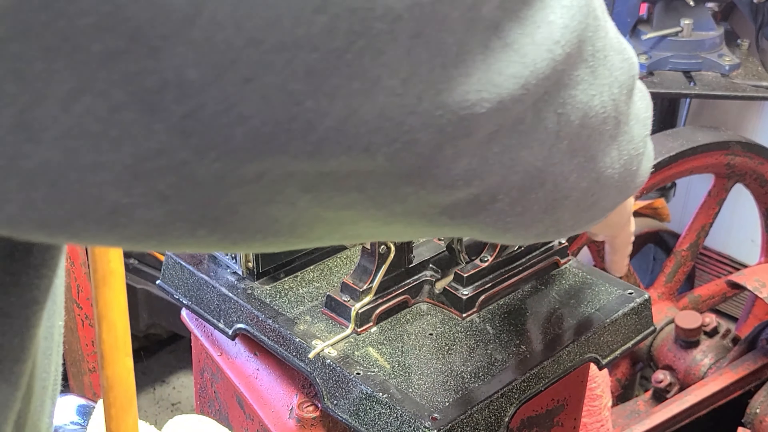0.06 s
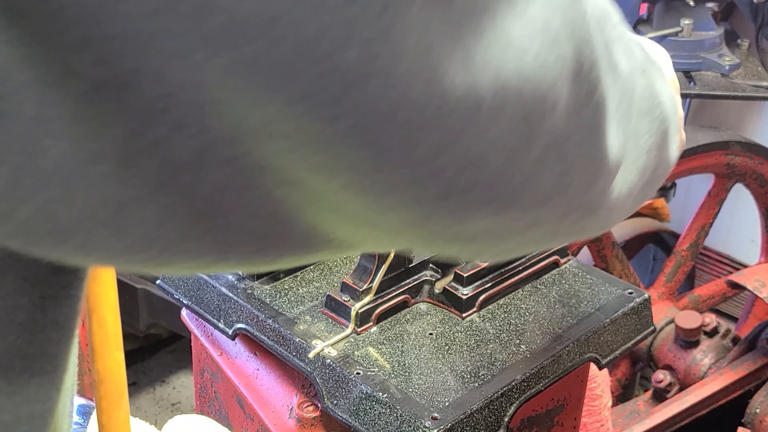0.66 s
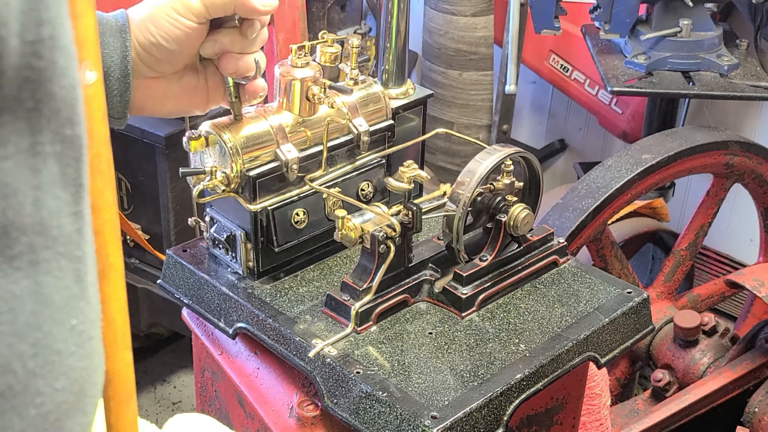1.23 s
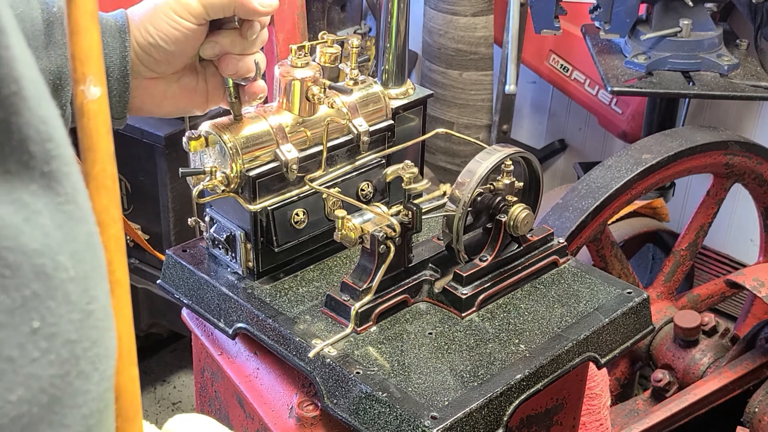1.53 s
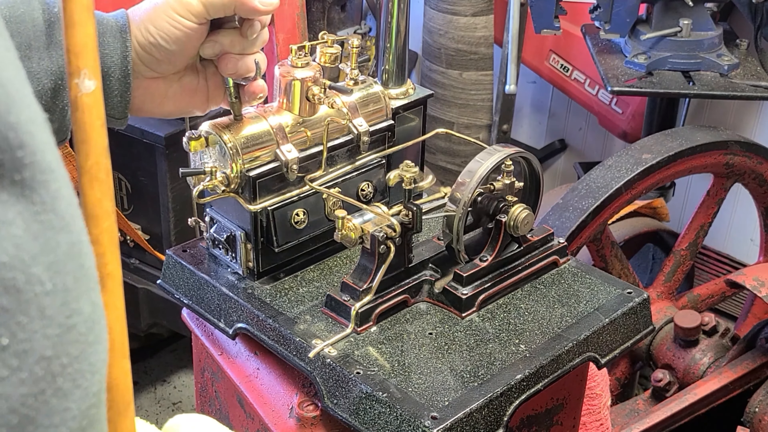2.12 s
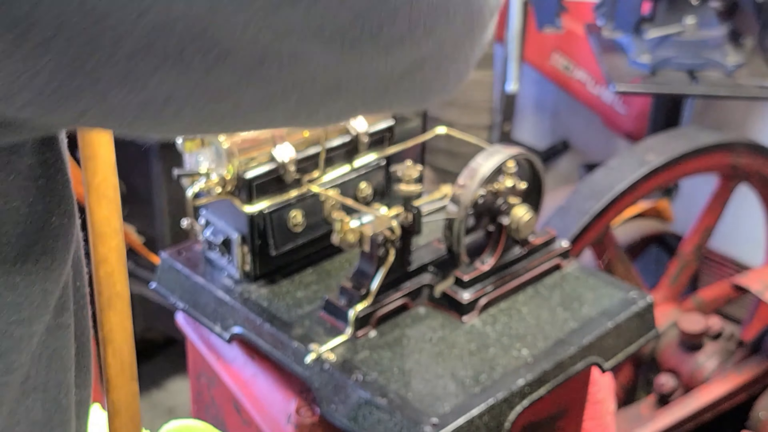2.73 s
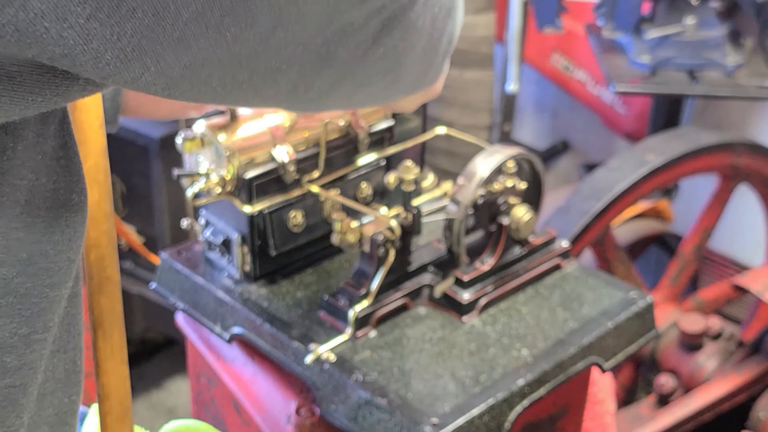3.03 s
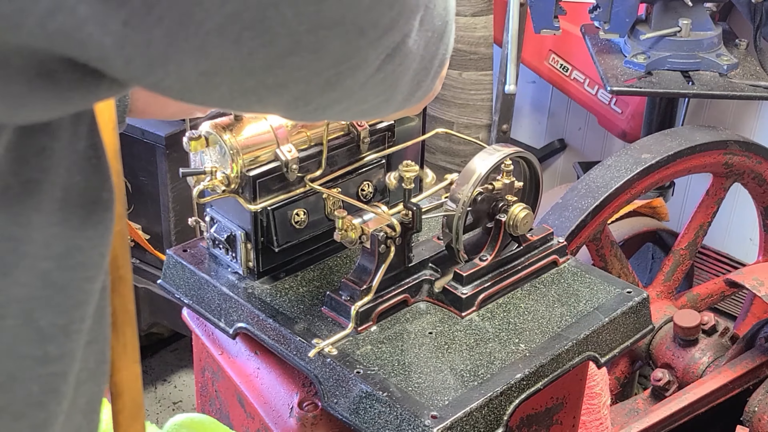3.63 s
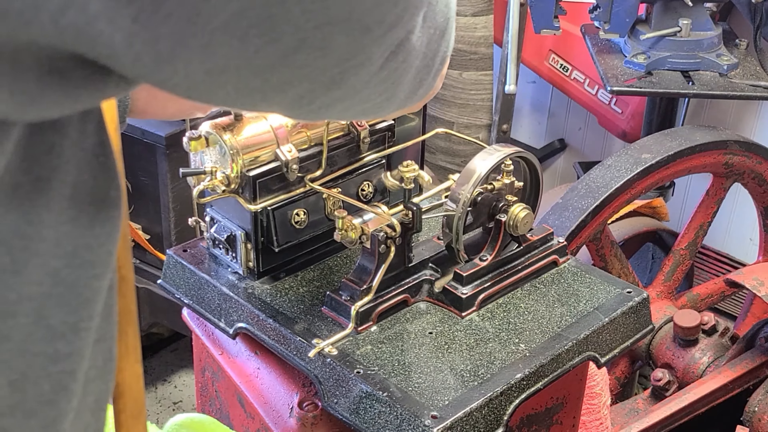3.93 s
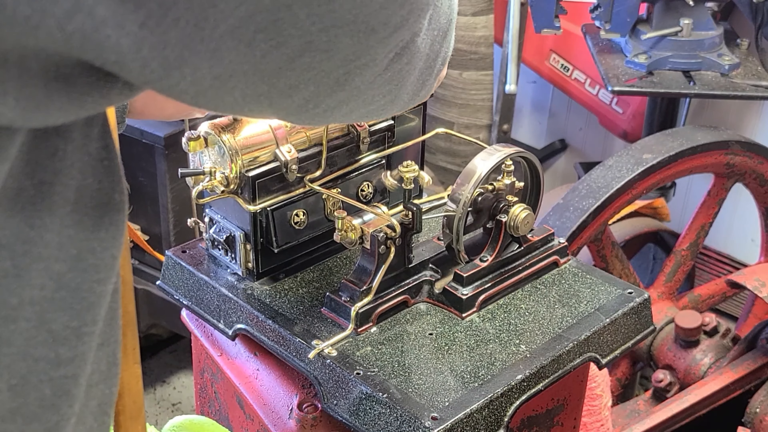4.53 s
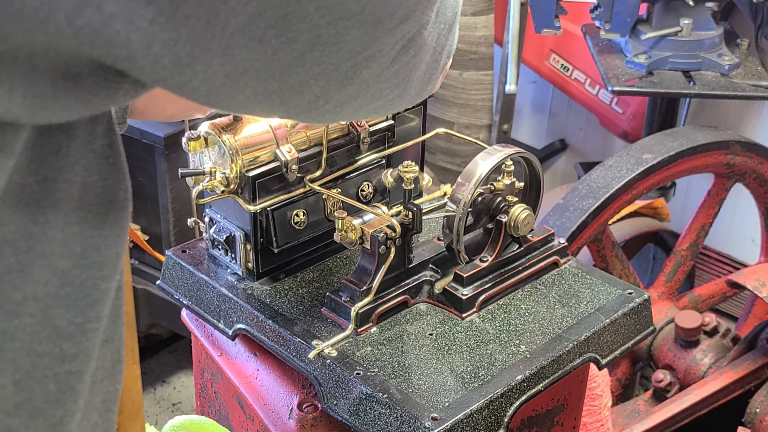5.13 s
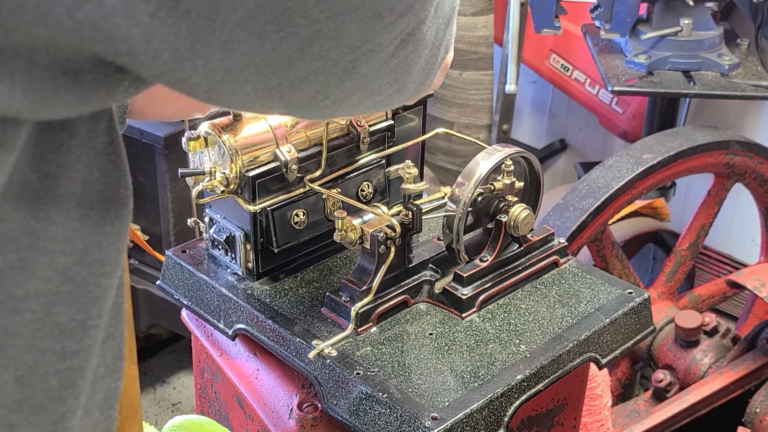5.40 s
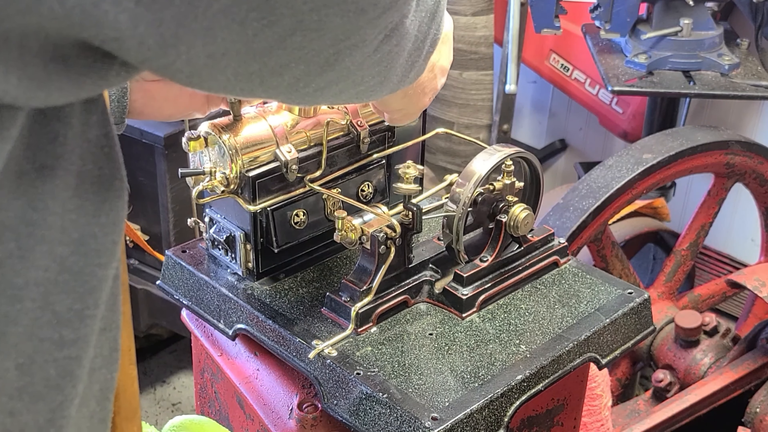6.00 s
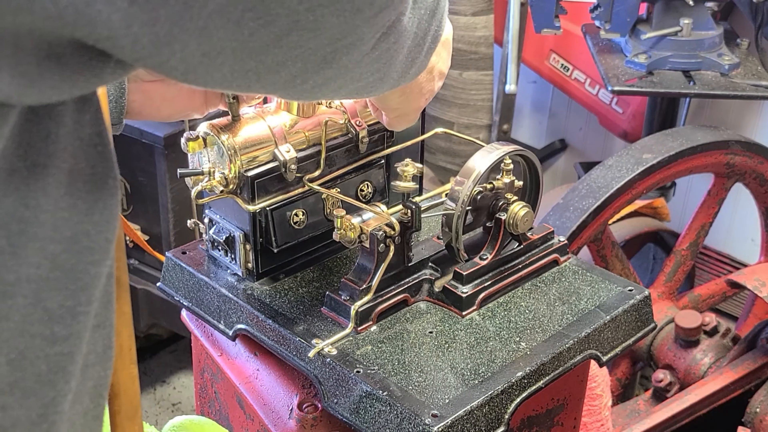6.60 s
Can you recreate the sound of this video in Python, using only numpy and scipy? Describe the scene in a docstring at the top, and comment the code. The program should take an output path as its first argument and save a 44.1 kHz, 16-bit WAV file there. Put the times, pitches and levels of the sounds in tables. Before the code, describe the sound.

Heard up close in a garage, air hisses steadily from the fittings of a small model steam engine while it chuffs rapidly, bright knocks alternating with hollower puffs. The hiss wavers, then settles, with a soft rumble underneath. After about five seconds the whistle is pulled three times, its shrill tone gliding upward into a thin, piercing squeal. The engine and hiss drop in level as the whistle sounds.

```python
"""Air leaks hiss over a low rumble and hum, swelling as a hand works the valves, shaded at times by an arm.
A toy steam engine runs on compressed air on a garage bench: about seven turns a second, two chuffs
a turn, each ringing the exhaust pipe and frame. Its whistle is pulled three times: the tone glides up
as the valve opens, then overblows into a squeal, and the phone's gain control ducks."""
import sys
import numpy as np
from scipy import signal
from scipy.fft import rfft, irfft
from scipy.io import wavfile
from scipy.ndimage import uniform_filter1d, minimum_filter1d

SR = 44100
rng = np.random.default_rng(int(sys.argv[2]) if len(sys.argv) > 2 else 0)


def master_out(mix):
    """Clip the mix to full scale and print it as 16-bit PCM to the path in sys.argv[1]."""
    frames = np.transpose(np.atleast_2d(mix))
    ceiling = np.clip(frames, -1, 1)
    pcm = np.round(ceiling * 32767).astype(np.int16)
    wavfile.write(sys.argv[1], SR, pcm)


N = 297675
TIME_S = np.arange(N) / SR

# leak bands before trim (time [s], body level [dB], top re body [dB], low band re body [dB])
LEAK_LEVELS = [(0.0, -28, 5.5, -5.5), (0.22, -24.0, 4.5, -4.5), (0.38, -25, 5, -6), (0.62, -26.0, 6, -5),
               (0.75, -26.5, 4.5, -3.6), (0.9, -28, 6, -2), (1.05, -24.5, 6.5, -7),
               (1.43, -21.5, 6.5, -3.5), (1.53, -25.6, 7, -4.5), (1.66, -23.5, 4.8, -7),
               (1.76, -22.5, 9.5, -7.5), (1.95, -25.5, 6, -4), (2.38, -24.1, 7, -5), (2.5, -26.9, 6, -1),
               (2.62, -25.5, 6.5, -5), (2.78, -24.9, 4.5, -7.5), (3.3, -25, 5.5, -7),
               (5.1, -24.0, 4.5, -7.5)]
# leak jet (frequency [Hz], level [dB])
LEAK_SPECTRUM = [(100, -15.5), (300, -16.5), (900, -11), (1600, -5.5), (2200, -5.5), (3300, -2.5),
                 (4400, -4), (5200, -3), (6100, 2.5), (7400, 0.5), (9200, -6.5), (11000, -4), (15700, 2),
                 (17000, -73)]
# hollow note in the air feed as its valve opens (time [s], level [dB], centre [Hz])
FEED_NOTE = [(0, -45, 2400), (.12, -33.5, 2350), (.48, -31, 2267), (.88, -29, 2398), (1.1, -36.5, 2650),
             (1.5, -37.5, 2680), (2.4, -36, 2470), (2.8, -46, 2496)]
# room and bench rumble before trim (time [s], level [dB])
RUMBLE_LEVELS = [(0.2, -44), (1.1, -46.5), (1.8, -49.8), (2.4, -45.5), (3.2, -43.5), (3.7, -46),
                 (4.1, -40.5), (4.8, -42)]
# rumble (frequency [Hz], level [dB])
RUMBLE_SPECTRUM = [(15, -46), (35, -15), (53, -0.5), (66, -4.5), (90, -14), (140, -22.5), (300, -32),
                   (1000, -82)]
# hum (frequency [Hz], level [dB])
HUM_LINES = [(71.5, -49), (120, -67.5)]
# flywheel (time [s], speed [turns/s])
FLYWHEEL_SPEED = [(0.2, 5.762), (0.58, 6.655), (1, 6.931), (1.72, 6.499), (2.7, 6.838), (3.2, 7.018),
                  (4.9, 7.191), (5.35, 7.295), (6.2, 7.098)]
# exhaust strength (time [s], head end gain [dB], crank end gain [dB])
EXHAUST_DRIVE = [(.22, -3, -4.5), (.38, 1, 2), (.55, 1, 3), (1.5, 0.7, 1.5), (2.4, 0, 0.5), (3, 1, 2),
                 (5, 1.7, 1), (6.7, 0, 1)]
# exhaust pipe and frame modes (frequency [Hz], t60 [s], head end gain [dB], crank end gain [dB])
EXHAUST_MODES = [(294, 0.058, -21, -12), (381, 0.063, -24, -14), (476, 0.048, -25, -32),
                 (512.6, 0.12, -11.5, -22), (544.7, 0.16, -8.5, -24), (713, 0.073, -18, -8),
                 (776, 0.11, -3.5, -2.5), (880, 0.048, -43, -24), (983, 0.11, -10.5, -10.5),
                 (1095.3, 0.16, -30.5, -10), (1123, 0.14, -12.5, -3.5), (1213, 0.082, -8, -5),
                 (1392, 0.044, 7, -4), (1438, 0.042, -46, -0.5), (1547.5, 0.076, 1, -7.5),
                 (1782, 0.049, -2.5, -1), (2050, 0.034, 1, 0), (2384, 0.033, 6.5, -18)]
# one puff of air (frequency [Hz], level [dB])
PUFF_SPECTRUM = [(100, -28), (180, -11.5), (330, -8), (520, -2.5), (640, -9), (800, -1.5), (1400, -5),
                 (2000, -5.5), (3000, -7), (5000, -6.5), (16000, -32)]
# whistle pulls (valve half open [s], half shut [s], valve edge [s], overblown from [s], until [s],
# squeal pitch [Hz], squeal level [dB])
WHISTLE_PULLS = [(5.174, 5.715, .02, 5.248, 5.672, 14760, -3),
                 (6.124, 6.358, .018, 6.178, 6.336, 14740, -2), (6.655, 7.0, .013, 6.684, 7.0, 15060, 3)]


def undb(db):
    """Decibels to gain."""
    return 10 ** (np.asarray(db) / 20)


def unit_rms(x):
    """Scale to rms 1."""
    return x / np.sqrt(np.mean(x ** 2))


def curves(table):
    """Table columns, interpolated linearly in time."""
    times_s, *columns = np.transpose(table)
    return [np.interp(TIME_S, times_s, column) for column in columns]


def colour(x, spectrum):
    """Filter by (frequency [Hz], gain [dB]) points."""
    hz, db = np.transpose(spectrum)
    bins_hz = np.fft.rfftfreq(x.shape[-1], 1 / SR)
    return irfft(rfft(x) * undb(np.interp(np.log(bins_hz + 1), np.log(hz), db)), x.shape[-1])


def wander(rate_hz):
    """Smooth random curve, rms 1."""
    hold = max(int(SR / rate_hz), 2)
    held = rng.standard_normal(N)[np.arange(N) // hold]
    return unit_rms(uniform_filter1d(uniform_filter1d(held, hold), hold))


def phase_rad(hz):
    """Running phase of a pitch curve."""
    return 2 * np.pi * np.cumsum(hz * np.ones(N)) / SR


def wavering_sine(hz, depth, rate_hz):
    """Sine of rms 1 with random relative pitch jitter."""
    return np.sqrt(2) * np.sin(phase_rad(hz * (1 + depth * wander(rate_hz))))


def blown(hz, width_hz):
    """Turbulence ringing a resonance whose centre may move."""
    lowpass = signal.butter(2, width_hz / 2, fs=SR, output="sos")
    a, b = signal.sosfilt(lowpass, rng.standard_normal((2, N)))
    return unit_rms(a * np.cos(phase_rad(hz)) + b * np.sin(phase_rad(hz)))


def step(x):
    """Smooth 0 to 1, halfway at x = 0."""
    return .5 + .5 * np.tanh(x / 2)


def gate(start_s, end_s, edge_s):
    """Soft-edged time window."""
    return step((TIME_S - start_s) / edge_s) * step((end_s - TIME_S) / edge_s)


def mic_pair(x, lag_ms):
    """Sound reaches the left microphone first."""
    bins_hz = np.fft.rfftfreq(2 * N, 1 / SR)
    delay = np.exp(-2j * np.pi * bins_hz * lag_ms / 1000)
    return np.array([x, irfft(rfft(x, 2 * N) * delay)[:N]])


def garage(x, lag_ms, wet_db, t60_s, correlation=0.):
    """Direct sound plus dense bench and wall reflections."""
    t = TIME_S[:SR // 2]
    mid, side = rng.standard_normal((2, len(t))) * undb(-60 * t / t60_s) * (t > .002)
    tail = mid * np.sqrt(1 + correlation) + side * np.sqrt(1 - correlation) * np.array([[1], [-1]])
    tail = unit_rms(tail) / np.sqrt(len(t))
    wet = signal.fftconvolve(x[None], tail, axes=1)[:, :N]
    return (mic_pair(x, lag_ms) + undb(wet_db) * wet) / np.hypot(1, undb(wet_db))


def leak():
    """Air jets from the fittings and rings the feed; the top of the hiss is shaded most easily."""
    body_db, top_db, low_db = curves(LEAK_LEVELS)
    feed_db, feed_hz = curves(FEED_NOTE)
    jet = colour(rng.standard_normal((3, N)), LEAK_SPECTRUM)  # direct, room left, room right
    top = colour(jet, [(6500, -52), (9000, 2.5)])
    low = colour(jet, [(1200, -30), (2600, 0), (5000, 0), (6500, -30)])
    body = jet - top - low
    hiss = undb(.5) * unit_rms(body) + undb(top_db + .5) * unit_rms(top) + undb(low_db - .5) * unit_rms(low)
    feed = undb(feed_db + 1.3 * wander(10)) * np.array([blown(feed_hz, width_hz=670) for _ in jet])
    air = undb(body_db + .45 * wander(20)) * hiss + feed
    room_gain = undb(5)
    return (mic_pair(air[0], lag_ms=.11) + room_gain * air[1:]) / np.hypot(1, room_gain)


def rumble_and_hum():
    """Room and bench rumble with a wavering hum, nearly alike in both ears."""
    mid, side = unit_rms(colour(rng.standard_normal((2, N)), RUMBLE_SPECTRUM))
    rumble = undb(curves(RUMBLE_LEVELS)[0] + 1.5) * (mid + undb(-13) * side * np.array([[1], [-1]]))
    hum = sum(undb(db + 2 * wander(6.1)) * wavering_sine(hz, depth=.0113, rate_hz=5)
              for hz, db in HUM_LINES)
    return (rumble + hum) * undb([[-.7], [.7]])


def stroke_times_s(offset_turns):
    """One stroke per flywheel turn, offset from the head end's knock."""
    first_knock_s = .315
    turns = np.cumsum(curves(FLYWHEEL_SPEED)[0]) / SR
    turns -= np.interp(first_knock_s, TIME_S, turns)
    return np.interp(np.arange(offset_turns, turns[-1]), turns, TIME_S)


def exhaust(times_s, drive_db, modes_db, ring_db, scatter_db, air_db, rise_s, fall_s):
    """Each port opening rings the pipe with a varying mode balance, plus fresh turbulence."""
    t = TIME_S[:SR // 5]
    stroke_db = np.interp(times_s, np.transpose(EXHAUST_DRIVE)[0], drive_db)
    stroke_db += .5 * rng.standard_normal(len(times_s))
    hz, t60_s = np.transpose(EXHAUST_MODES)[:2, :, None]
    build_s = rise_s + 3.2 / hz  # low modes fill more slowly
    envelopes = (1 - np.exp(-(t / build_s) ** 2)) * undb(-60 * t / t60_s)
    modes = envelopes * np.sin(2 * np.pi * (hz * t + rng.random(hz.shape)))
    rings = undb(ring_db + modes_db + 2 * rng.standard_normal((len(times_s), len(hz)))) @ modes
    # scatter in the frame fills the gaps between modes, alike on every stroke
    scatter = undb(scatter_db) * unit_rms(colour(rng.standard_normal(len(t)), PUFF_SPECTRUM))
    air = undb(air_db) * unit_rms(colour(rng.standard_normal(rings.shape), PUFF_SPECTRUM))
    swell = (1 - np.exp(-t / (2 * rise_s))) * np.exp(-t / fall_s)
    chuffs = rings + swell * (scatter + air)
    out = np.zeros(N + 2 * len(t))
    for start, db, chuff in zip((times_s * SR).astype(int), stroke_db, chuffs):
        out[start:start + len(t)] += undb(db) * chuff
    return out[:N]


def engine():
    """The head end exhausts with a bright knock; the crank end opens more slowly, sounds hollower."""
    _, head_drive_db, crank_drive_db = np.transpose(EXHAUST_DRIVE)
    head_modes_db, crank_modes_db = np.transpose(EXHAUST_MODES)[2:]
    head = exhaust(stroke_times_s(offset_turns=0), head_drive_db, head_modes_db,
                   ring_db=-20.5, scatter_db=-27.5, air_db=-29.5, rise_s=.003, fall_s=.071)
    crank = exhaust(stroke_times_s(offset_turns=-.547), crank_drive_db, crank_modes_db,
                    ring_db=-21.5, scatter_db=-20.5, air_db=-21, rise_s=.005, fall_s=.016)
    return garage(head + crank, lag_ms=.073, wet_db=-4, t60_s=.25, correlation=-.15)


def pipe_tone(opening, overblown):
    """First whistle mode: pitch follows the valve; level drops while overblown."""
    shut_hz, open_hz = 4358, 5330
    speaks_at, softness = .3, .027  # fractions of full opening
    singing_db = -.5 - 20.5 * overblown + .18 * wander(250)
    singing = step((opening - speaks_at) / softness) * undb(singing_db)
    # the valve fails to seat after the first pull: a faint note lingers
    seep_from_s, seep_until_s, fade_db_per_s = 5.79, 6.1, 48
    seep_db = -16 - fade_db_per_s * np.maximum(TIME_S - seep_from_s, 0) + 3 * wander(30)
    seeping = gate(seep_from_s, seep_until_s, edge_s=.0071) * undb(seep_db)
    pitch_hz = shut_hz + (open_hz - shut_hz) * opening
    return wavering_sine(pitch_hz, depth=.00274, rate_hz=350) * (singing + seeping)


def squeal(hz, db, caught):
    """Overblown mode: a fluttering high line in a narrow noise skirt, flat until it catches."""
    sag_hz, flutter_db = 219, 2.2
    pitch_hz = hz - sag_hz * (1 - caught) + 25 * wander(16)
    line = wavering_sine(pitch_hz, depth=.0029, rate_hz=500)
    skirt = undb(-16) * blown(pitch_hz, width_hz=210)
    return (line + skirt) * undb(db + flutter_db * wander(70)) * caught


def whistle():
    """The pipe sings as the valve opens or shuts; full pressure gives mouth rush, sizzle and squeal."""
    opening = overblown = squeals = 0
    for open_s, shut_s, edge_s, from_s, until_s, hz, db in WHISTLE_PULLS:
        caught = gate(from_s, until_s, edge_s=.0071)
        opening += gate(open_s, shut_s, edge_s)
        overblown += caught
        squeals += squeal(hz, db, caught)
    mouth = (blown(5250, width_hz=430)
             + undb(-7.5) * blown(4880, width_hz=160)
             + undb(-.5) * blown(5650, width_hz=1200))
    rush = opening * undb(-16 + 1.3 * wander(40)) * mouth
    tone = pipe_tone(opening, overblown)
    sizzle = opening * undb(-18) * blown(15200, width_hz=1000)
    return (garage(tone + rush, lag_ms=.068, wet_db=-8.5, t60_s=.17)
            + garage(squeals + sizzle, lag_ms=.09, wet_db=-9.5, t60_s=.17))


def scene():
    """Stereo sum of the sources."""
    return leak() + rumble_and_hum() + engine() + whistle()


def gain_control(x, ceiling_db, release_db_per_s, window_s):
    """Gain drops at once above the ceiling, then creeps back."""
    power = uniform_filter1d(np.mean(x ** 2, axis=0), int(window_s * SR))
    excess_db = np.maximum(10 * np.log10(np.abs(power) + 1e-12) - ceiling_db, 0)
    recovery_db = release_db_per_s * TIME_S
    return x * undb(recovery_db - np.maximum.accumulate(excess_db + recovery_db))


def record(dry):
    """The phone ducks under the whistle, limits peaks and cuts the top."""
    peak_limit, cutoff_hz = .95, 15720
    ducked = gain_control(dry, ceiling_db=-7, release_db_per_s=4, window_s=.022)
    peak_gain = np.minimum(1, peak_limit / (np.abs(ducked).max(axis=0) + 1e-9))
    limited = ducked * uniform_filter1d(minimum_filter1d(peak_gain, size=200), size=200)
    return signal.sosfilt(signal.ellip(12, .2, 80, cutoff_hz, fs=SR, output="sos"), limited)


dry = scene()
out = record(dry)
master_out(out)
```